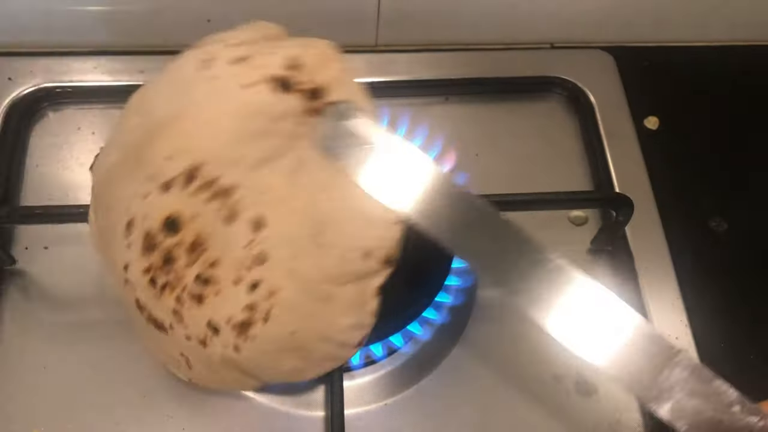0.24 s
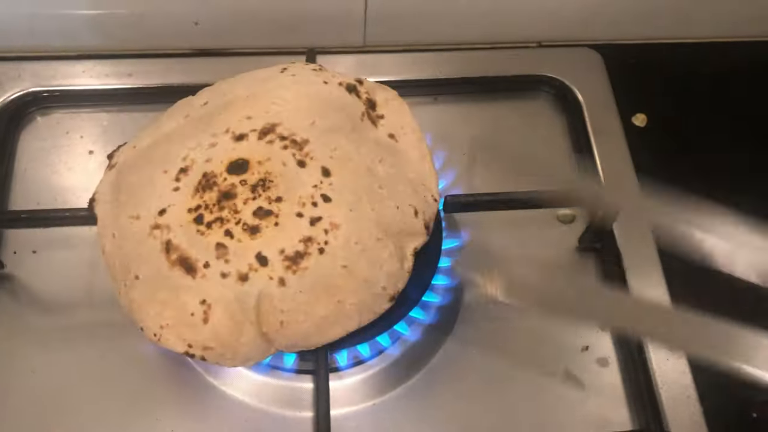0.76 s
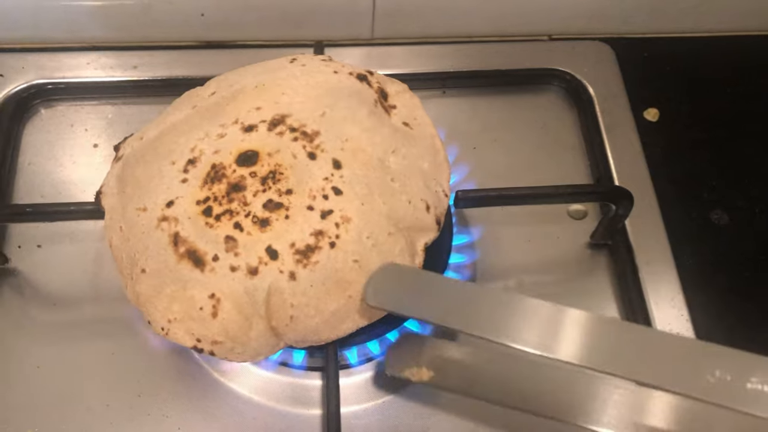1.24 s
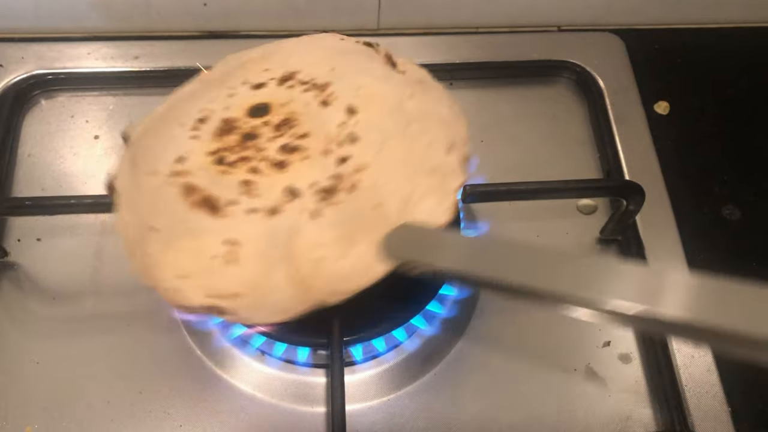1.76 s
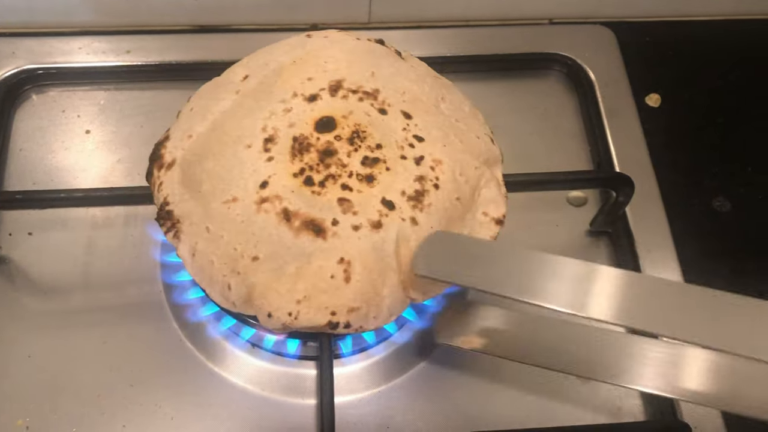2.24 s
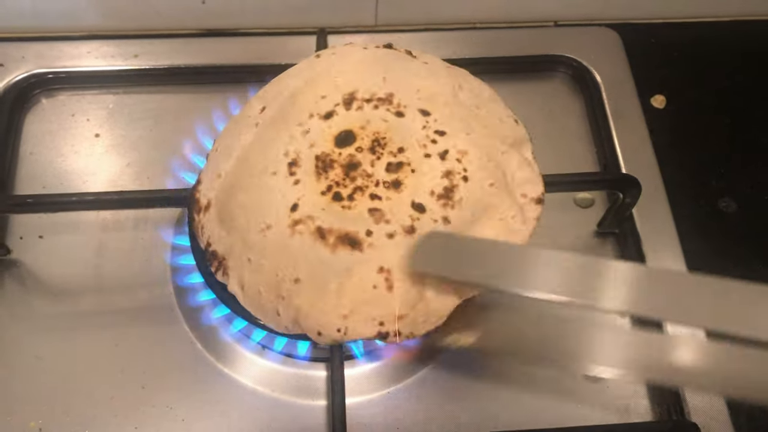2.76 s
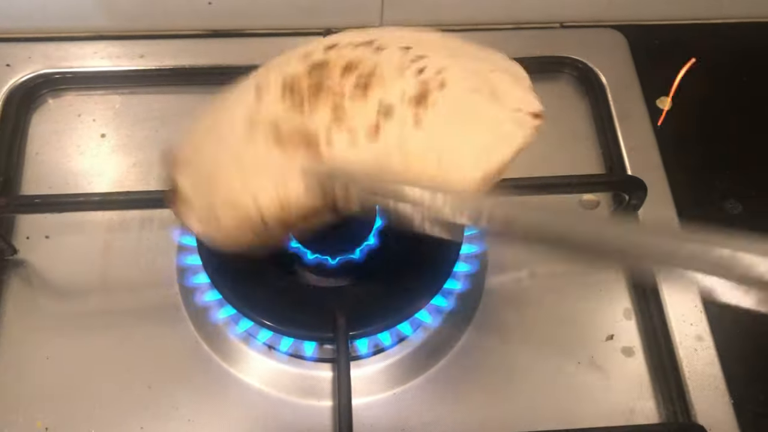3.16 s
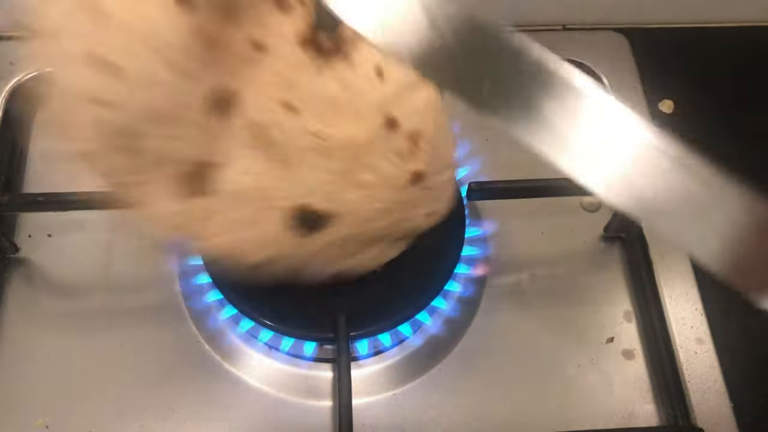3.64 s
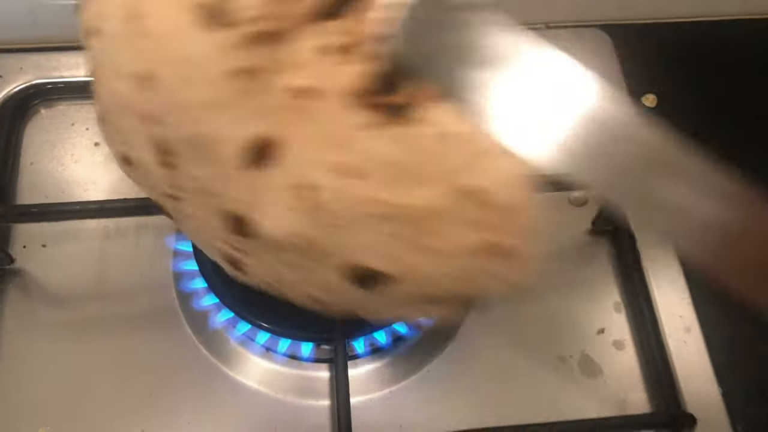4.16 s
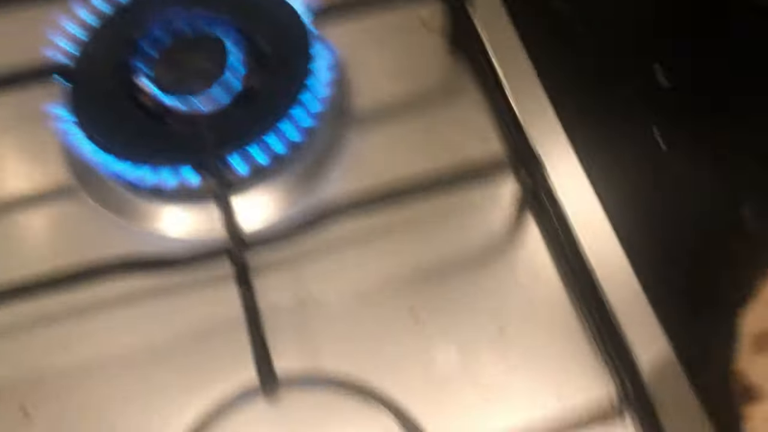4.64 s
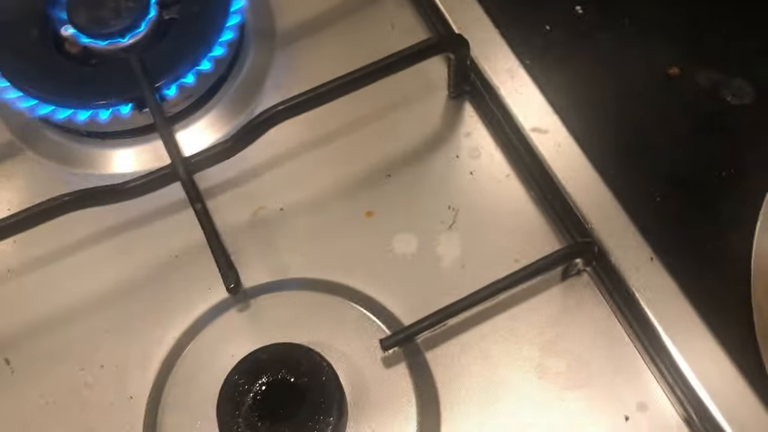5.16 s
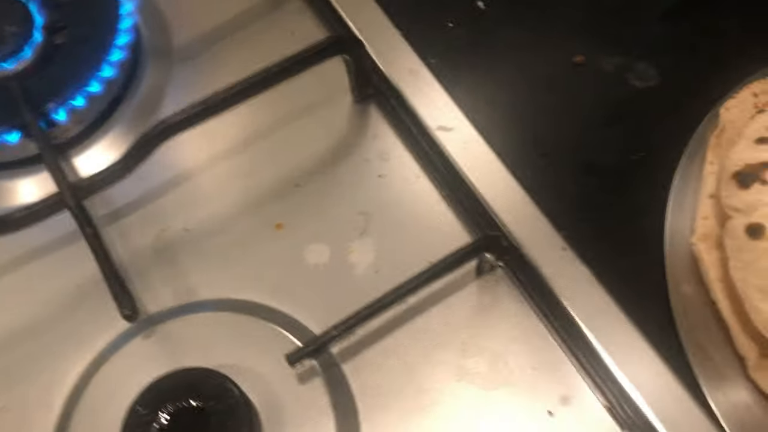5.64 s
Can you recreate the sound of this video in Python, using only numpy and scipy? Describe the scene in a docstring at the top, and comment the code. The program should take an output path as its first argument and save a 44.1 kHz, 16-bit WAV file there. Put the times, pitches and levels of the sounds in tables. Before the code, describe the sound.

In a small, hard-walled kitchen, a close microphone picks up the steady soft rush of a gas flame, faint whistling jets and a low hum. First comes a short gritty drag of flatbread across the grate. Scattered scuffs, little thuds and snaps of scorching crust follow as it is handled. Finally steel tongs hit the counter twice and rattle with a high metallic ring, the loudest sound.

```python
"""A small hard kitchen, a phone microphone close over a gas burner: steel tongs turn a flatbread.
The flame roars softly, gas whistles through the jets and a motor hums. The bread drags onto the grate,
then its crust scuffs, thuds and ticks as it scorches. The whistles change colour as the phone swings aside.
At the end the tongs drop on the counter and bounce, ringing in many high modes off the tiled walls."""
import sys
import numpy as np
from scipy import signal
from scipy.fft import rfft, irfft
from scipy.io import wavfile
from scipy.ndimage import uniform_filter1d

SR = 44100
rng = np.random.default_rng(int(sys.argv[2]) if len(sys.argv) > 2 else 0)


def wav_record(signal):
    """Record a signal, one row per channel, as 16-bit PCM in the file named by sys.argv[1]."""
    frames = np.transpose(np.atleast_2d(signal))
    bounded = np.clip(frames, -1, 1)
    # unit amplitude maps onto the largest positive 16-bit level
    quanta = np.round(bounded * 32767).astype(np.int16)
    wavfile.write(sys.argv[1], SR, quanta)


N = 260190
T = np.arange(N) / SR

# spectrum of flame and room air: frequency_hz, relative_db
ROAR_SPECTRUM = [(18, -44), (30, -18), (50, -17.5), (80, -8.5), (130, -4.5), (230, -11), (337, -15),
                 (496, -18.5), (1620, -21), (2300, -36), (4260, -37.5), (7600, -39), (11000, -42.5),
                 (16000, -38.5)]
# treble hiss of the flame, with a swell of crust rustle near 3 s: time_s, offset_db
HISS_AND_RUSTLE = [(0, -5), (.7, -2.5), (2.1, -1.5), (2.95, 1.5), (3.6, -2), (4.4, -1.5), (5.1, 2.5),
                   (5.6, 4.5)]
# jet whistles, and in the last row a broad top-treble hiss that dips midway and partly returns:
# pitch_hz, width_hz, early_db, midway_db, late_db
WHISTLES_AND_HISS = [(1637, 180, -70.5, -81, -82), (2360, 53, -79, -88, -79), (3080, 97, -75.5, -84, -80),
                     (3770, 78, -76, -77, -77.5), (5500, 93, -80.5, -79, -81),
                     (5920, 110, -81.5, -71.5, -69.5), (6630, 180, -76.5, -70, -77.5),
                     (8950, 250, -75, -83, -73), (11200, 650, -72.5, -73, -81),
                     (11740, 430, -90, -75, -72.5), (11900, 200, -76.5, -76, -82),
                     (13200, 300, -81, -84, -77), (15500, 1900, -71, -81, -77)]
# motor tones: pitch_hz, level_db, waver_db
MOTOR_TONES = [(102.3, -66, 4), (151.6, -66.5, 0.5), (193.2, -52, 0.5), (334, -71.5, 6.5),
               (568.5, -73.5, 3.5)]
# modes of the rubbed grate: pitch_hz, relative_db, t60_s
GRATE_MODES = [(890, -1, .05), (1690, -8, .08), (2046, -2, .08), (2505, -8, .1), (2595, -5, .15),
               (2987, -10, .12), (3553, -5, .12), (3630, -5, .06), (4110, -5, .07), (4530, -7, .04),
               (6067, -12, .05)]
# crust against tongs or grate: start_s, grit_db, treble_re_grit_db, length_s, thud_db, thud_hz
CRUST_SCUFFS = [(.285, -45, -5, 0.012, -39, 269), (0.3116, -50, -20, .013, -39.5, 236),
                (0.466, -59.5, -27, 0.052, -48, 966), (0.488, -61, -20, .018, -48, 260),
                (0.554, -69, -15, 0.0084, -47.5, 246), (1.634, -57.5, -1, 0.022, -52, 407),
                (1.653, -46.5, 2.5, 0.021, -47, 462), (1.673, -53, -8, 0.02, -52, 368),
                (2.482, -51, -8, 0.027, -60, 324), (2.493, -57, -6, .015, -43.5, 362),
                (2.512, -59, 5.5, 0.02, -59, 393), (2.848, -55.5, -9, 0.022, -60, 257),
                (2.9065, -56, -18, .013, -50, 387), (2.953, -55, -14, .022, -45.5, 310),
                (2.9707, -59, -14, 0.044, -46.5, 750), (3.0724, -42.5, -7.5, 0.014, -51, 652),
                (3.079, -42, -7, 0.012, -40.5, 373), (3.126, -58, 1, 0.021, -50, 318),
                (3.744, -58, -3, 0.018, -54, 248), (3.752, -51.5, -3, 0.017, -45, 334),
                (3.778, -58, -3, .02, -44.5, 302), (3.828, -62, -4, .022, -47, 293),
                (4.573, -66, -20, .018, -58, 1630), (4.9292, -40, -20, 0.028, -67, 254),
                (4.9358, -41.5, 10, 0.011, -44.5, 468), (4.963, -51, -4, 0.053, -56, 297),
                (5.063, -50.5, -11, 0.043, -52, 584), (5.082, -51, -7, 0.016, -58, 248),
                (5.096, -42, -4.5, 0.015, -62, 407), (5.1434, -50, -6, 0.028, -51, 802)]
# snaps of the scorching crust: start_s, gain_db, pitch_hz
CRUST_TICKS = [(1.594, -47, 6590), (1.7564, -56, 3080), (1.8273, -46, 5400), (1.8407, -52, 3730),
               (2.407, -49, 3770), (2.583, -51, 12500), (3.0011, -40, 4840), (3.014, -40, 3080),
               (3.28, -57, 7500), (3.4307, -39, 3800), (3.4476, -52, 3850), (4.129, -49, 8200),
               (4.49, -49, 6000), (5.5854, -47, 8770)]
# the tongs land twice and bounce: start_s, strength_db, place (0 tip, 1 arm), crack_db, thump_db
TONG_BLOWS = [(5.6615, -19, 0, -30, -39), (5.6655, -12, 0, -26, -41), (5.678, -11, 0, -27, -52),
              (5.6965, -19, 0, -41, -50), (5.7095, -22, 0, -48, -50), (5.724, -27, 0, -48, -43),
              (5.8235, -10, 1, -22, -36), (5.8262, -5, 1, -17, -44), (5.8445, -6, 1, -29, -32),
              (5.851, -9, 1, -29, -48), (5.866, -15, 1, -31, -45), (5.886, -17, 1, -33, -35)]
# modes of the steel tongs: pitch_hz, tip_struck_db, arm_struck_db, t60_s
TONG_MODES = [(500, -46, -40, .15), (1350, -40, -38, .2), (1690, -37, -46, .3), (2342, -52, -42, .4),
              (3065, -50, -47, .4), (3259, -50, -37, .5), (3542, -37, -52, .2), (4343, -50, -34, .35),
              (4452, -41, -42, .3), (5362, -44, -32, .3), (5920, -48, -29, .4), (6440, -30, -39, .3),
              (7061, -50, -33, .5), (7674, -43, -46, .26), (8608, -38, -38, .3), (8696, -30, -27, .2),
              (9994, -28, -25, .25), (10023, -11, -10, .25), (10430, -28, -41, .2), (10880, -36, -39, .28),
              (11074, -33, -25, .3), (11142, -47, -25, .4), (11850, -39, -38, .2), (11984, -37, -27, .3),
              (12228, -37, -20, .3), (12888, -38, -19, .4), (13091, -42, -27, .3), (13800, -32, -28, .25),
              (13880, -33, -28, .2), (15052, -40, -19, .4), (15470, -29, -21, .15)]
# decay of the kitchen by band: centre_hz, t60_s
KITCHEN_DECAY = [(250, 0.41), (1000, 1), (3000, 0.97), (7000, 0.2), (14000, 0.24)]

SHIFT_S = (4.42, 4.75, 5.4)  # times of the early, midway and late levels
ROAR_DB, KITCHEN_DB = -53, -10.5
DRAG_START_S, BITE_S, SLIDE_S = .157, .028, .11
DRAG_DB, SLIDE_DB_PER_S, SETTLE_DB_PER_S = -39, -36.5, -80
DRAG_TREBLE_DB, DULLING_DB_PER_S, DULLEST_DB = 2.5, -80, -25  # treble goes as the slide slows
DRAG_BODY_DB, FILLING_DB_PER_S = -13, 55.5  # body grows as the bread lies down
RUSTLE_DB, RUSTLE_DB_PER_S = -57, 65


def undb(db):
    """Gain of a level in dB."""
    return 10 ** (np.asarray(db) / 20)


def unit(x):
    """Scaled to rms 1."""
    return x / np.sqrt(np.mean(x ** 2))


def band(x, lo_hz, hi_hz, order=2):
    """Causal band-pass."""
    sos = signal.butter(order, [lo_hz, min(hi_hz, .45 * SR)], "band", fs=SR, output="sos")
    return signal.sosfilt(sos, x)


def ring(x, hz, t60):
    """One decaying mode; a unit blow rings with amplitude 1."""
    r, w = np.exp(-np.log(1000) / (t60 * SR)), 2 * np.pi * hz / SR
    return signal.lfilter([0, r * np.sin(w)], [1, -2 * r * np.cos(w), r * r], x)


def wander(rate_hz):
    """Smooth random drift, rms 1."""
    hold = int(SR / rate_hz)
    steps = np.repeat(rng.standard_normal(N // hold + 1), hold)
    return unit(uniform_filter1d(uniform_filter1d(steps, hold), hold)[:N])


def grit(spread_db):
    """Noise of uneven grains, each a fraction of a millisecond long."""
    grains = np.minimum(rng.exponential(size=N // 16 + 1), 3)
    return unit(undb(spread_db * np.repeat(grains, 16)[:N]) * rng.standard_normal(N))


def swell(t, rise_s):
    """A quick rise from t = 0 and a slower fall, top 1."""
    u = np.clip(t, 0, None) / rise_s
    return np.e * u * np.exp(-u)


def impact(t):
    """The very short push of a hard contact at t = 0."""
    return np.exp(-(t / .00002) ** 2)


def flame_roar(hiss_rustle_db):
    """The flame from close above: broad noise whose bands drift together and each on its own."""
    hz, db = np.transpose(ROAR_SPECTRUM)
    log_hz = np.log(np.arange(N // 2 + 1) * SR / N + 1)
    spectrum = rfft(rng.standard_normal(N)) * undb(np.interp(log_hz, np.log(hz), db))
    spectrum /= np.sqrt(np.mean(irfft(spectrum, N) ** 2))
    centres = np.log(20 * 2 ** np.arange(0, 10.6, .75))  # 3/4 octave apart
    out, gust = 0, wander(3.4)
    for centre in centres:
        share = np.interp(log_hz, centres, centres == centre)
        treble = np.clip((centre - np.log(1200)) / .37, 0, 1)
        drift_db = treble * hiss_rustle_db + .13 * gust + 1.8 * wander(6)
        out += irfft(spectrum * share, N) * undb(drift_db)
    return out * undb(ROAR_DB)


def jets_and_top_hiss(hiss_rustle_db):
    """Narrow gas whistles shift as the phone swings; a broad top hiss dips and partly returns."""
    out = 0
    for hz, width_hz, *stage_db in WHISTLES_AND_HISS:
        pole = np.exp(-np.pi * width_hz / SR)
        flutter = signal.lfilter([1], [1, -pole], rng.standard_normal((2, N)))
        phase = 2 * np.pi * np.cumsum(hz * (1 + .008 * wander(2.8))) / SR
        noise_band = unit(flutter[0] * np.cos(phase) + flutter[1] * np.sin(phase))
        level_db = np.interp(T, SHIFT_S, stage_db) + .32 * hiss_rustle_db + 2.95 * wander(4.77)
        out += noise_band * undb(level_db)
    return out


def motor_hum():
    """A motor under the flame: steady tones that waver in level and a little in pitch."""
    out = 0
    for hz, db, waver_db in MOTOR_TONES:
        amplitude = np.sqrt(2) * undb(db + waver_db * wander(21))
        out += amplitude * np.sin(2 * np.pi * hz * T + .39 * wander(5.4))
    return out


def bread_drag():
    """The bread rustles down, bites, slides and settles; its grit sets the grate ringing."""
    t = T - DRAG_START_S
    fall_db = SLIDE_DB_PER_S * np.clip(t, 0, SLIDE_S) + SETTLE_DB_PER_S * np.clip(t - SLIDE_S, 0, None)
    force = np.clip(t / BITE_S, 0, 1) * undb(DRAG_DB + fall_db)
    rub = grit(spread_db=1.7)
    grate = unit(sum(undb(db) * unit(ring(rub, hz, t60)) for hz, db, t60 in GRATE_MODES))
    scrape = unit(band(rub, 1070, 5850))
    bright = unit(band(rub, 2950, 10300)) + undb(-4) * unit(band(rub, 12200, 20000))
    treble = undb(np.maximum(DRAG_TREBLE_DB + DULLING_DB_PER_S * np.clip(t, 0, 1), DULLEST_DB)) * bright
    dull = unit(band(rng.standard_normal(N), 190, 1420))
    body = undb(DRAG_BODY_DB + FILLING_DB_PER_S * np.clip(t, 0, .5)) * dull
    rustle = (t < 0) * undb(RUSTLE_DB + RUSTLE_DB_PER_S * np.clip(t, None, 0)) * scrape
    return force * (undb(-1) * grate + undb(-2) * scrape + treble + body) + rustle


def grate_knock(start_s=.164, gain_db=-44):
    """The bread's edge knocks one bar, which rings in a single mode."""
    return undb(gain_db) * ring(impact(T - start_s), hz=GRATE_MODES[6][0], t60=.2)


def crust_scuffs():
    """Sudden bursts of grit, each over a hollow thud of the air trapped in the puffed bread."""
    rub, air = grit(spread_db=2.8), rng.standard_normal(N)
    middle = unit(band(rub, 310, 4230))
    treble = unit(band(rub, 3140, 9700)) + undb(.5) * unit(band(rub, 11400, 20000))
    out, t = np.zeros(N), T[:SR // 4]
    for start_s, grit_db, treble_db, length_s, thud_db, thud_hz in CRUST_SCUFFS:
        span = slice(int(start_s * SR), int(start_s * SR) + len(t))
        burst = np.clip(t / .002, 0, 1) * np.exp(-(t / length_s) ** 2)
        hollow = np.sin(2 * np.pi * thud_hz * t) + .67 * unit(ring(air[span], 1.36 * thud_hz, t60=.0032))
        out[span] += undb(grit_db) * burst * (middle[span] + undb(treble_db) * treble[span])
        out[span] += undb(thud_db) * swell(t, rise_s=.0065) * hollow
    return out


def crust_ticks():
    """The scorching crust gives single dry snaps."""
    out, t = np.zeros(N), T[:SR // 4]
    for start_s, db, hz in CRUST_TICKS:
        start = int(start_s * SR)
        snap = swell(t, rise_s=.0006) * rng.standard_normal(len(t))
        out[start:start + len(t)] += undb(db) * band(snap, hz / 2, hz * 1.18, order=1)
    return out


def tongs_drop():
    """Each contact cracks, thumps the counter and rings the steel; the arms rattle on after it."""
    t = T[T > TONG_BLOWS[0][0] - .01]
    chatter, shake = rng.standard_normal((2, len(t)))
    tip = arm = crack = thump = 0
    for start_s, db, place, crack_db, thump_db in TONG_BLOWS:
        age = t - start_s
        grind = undb(-36) * swell(age, .008) * shake
        push = undb(db) * (impact(age) + grind)
        tip += (place < .5) * push
        arm += (place >= .5) * push
        rattle = undb(-21) * swell(age, .015)
        crack += undb(crack_db) * (swell(age, .0023) + rattle)
        thump += undb(thump_db) * swell(age, .01)
    counter = (unit(band(chatter, 730, 1540)) + undb(-3.5) * unit(band(chatter, 240, 510))
               + undb(-11.5) * unit(band(chatter, 82, 120)))
    out = crack * unit(band(chatter, 3400, 13400)) + band(thump * counter, 65, 6000, order=3)
    for hz, tip_db, arm_db, t60 in TONG_MODES:
        blow = undb(tip_db) * tip + undb(arm_db) * arm
        partner = undb(-12) * ring(blow, 1.011 * hz, t60=.084)  # dies fast against the counter
        out += ring(blow, hz, t60) + partner
    return np.pad(out, (N - len(t), 0))


def kitchen(direct):
    """The close sound plus the tiled walls' answer, a dense tail that loses its treble first."""
    t, tail = T[:SR // 2], 0
    for hz, t60 in KITCHEN_DECAY:
        reflections = unit(band(rng.standard_normal(len(t)), hz / 4.1, hz * 4.36))
        tail += reflections * np.sqrt(hz) * np.exp(-np.log(1000) * t / t60)
    tail *= np.clip(t / .0031, 0, 1)
    tail /= np.sqrt(np.sum(tail ** 2))
    return direct + undb(KITCHEN_DB) * signal.fftconvolve(direct, tail)[:N]


def scene():
    """At the stove, in mono: crust and tongs ring in the room; drag, knock, burner and motor stay dry."""
    hiss_rustle_db = np.interp(T, *np.transpose(HISS_AND_RUSTLE))
    handling = kitchen(crust_scuffs() + crust_ticks() + tongs_drop()) + bread_drag() + grate_knock()
    return (handling + flame_roar(hiss_rustle_db) + jets_and_top_hiss(hiss_rustle_db) + motor_hum())[None]


def record(dry):
    """The phone microphone loses the bass below 38 Hz and cuts off steeply above 15.9 kHz."""
    heard = signal.sosfilt(signal.butter(2, 38, "high", fs=SR, output="sos"), dry)
    return signal.sosfilt(signal.ellip(10, .3, 60, 15900, fs=SR, output="sos"), heard)


dry = scene()
out = record(dry)
wav_record(out)
```